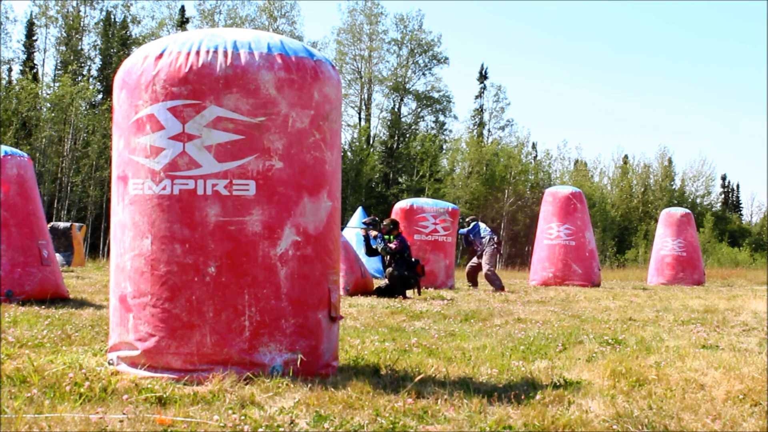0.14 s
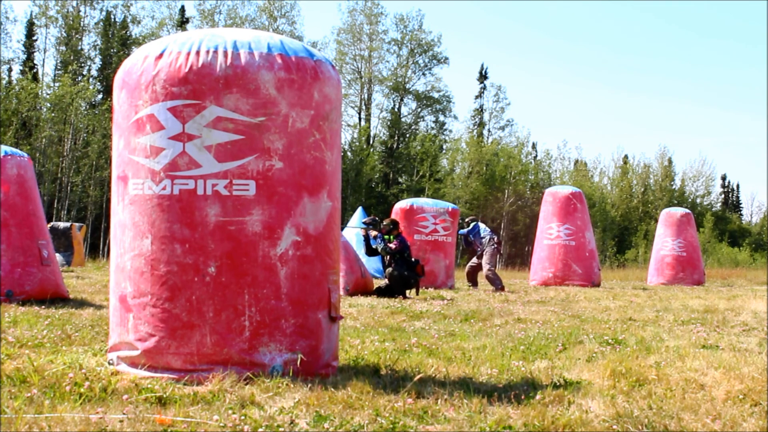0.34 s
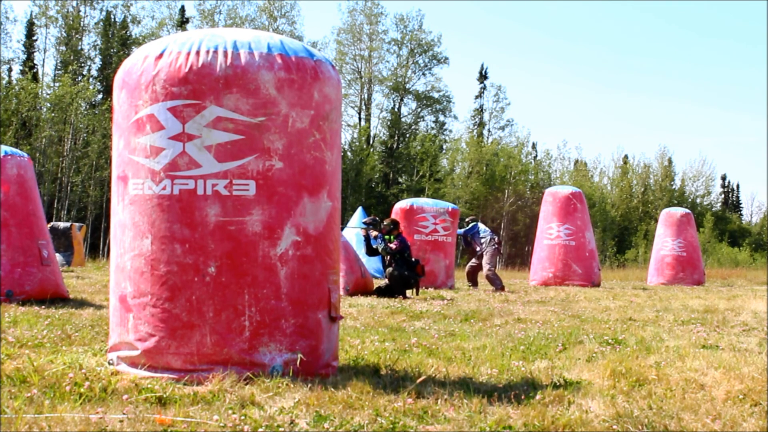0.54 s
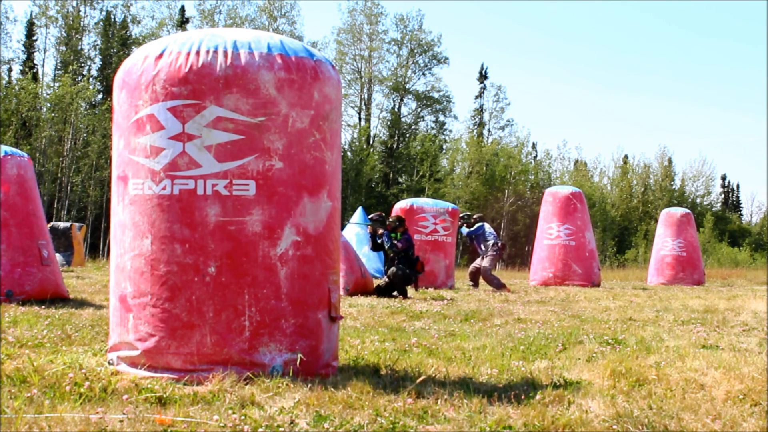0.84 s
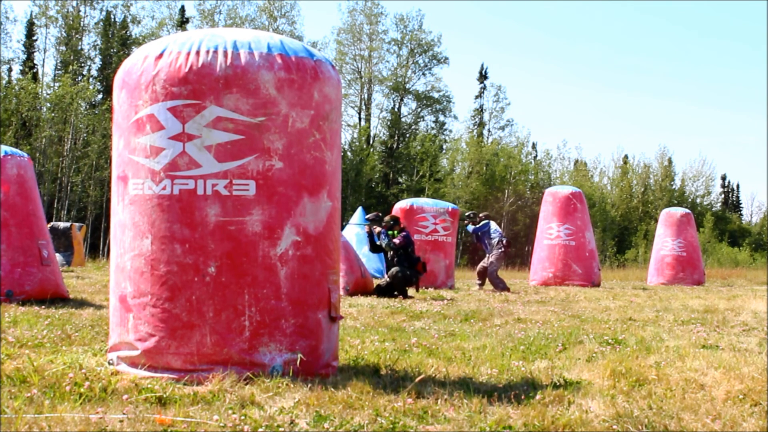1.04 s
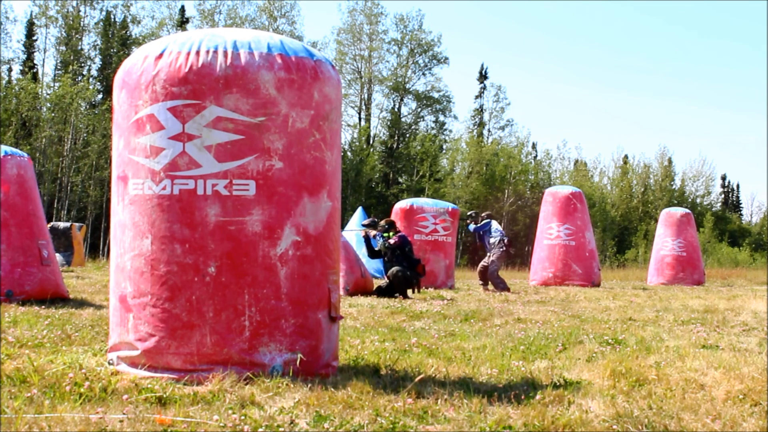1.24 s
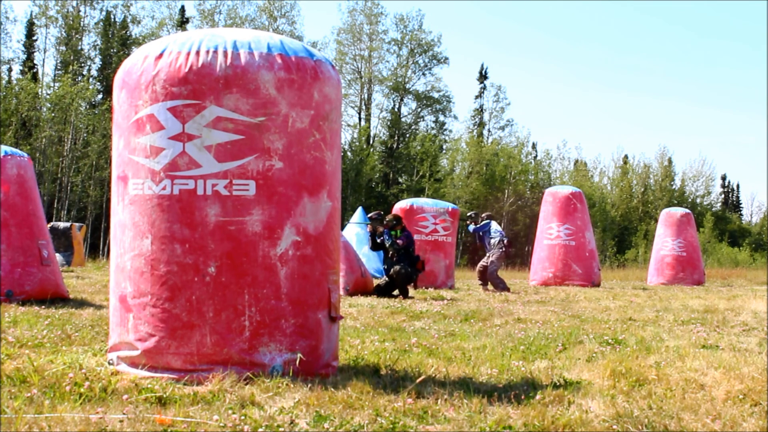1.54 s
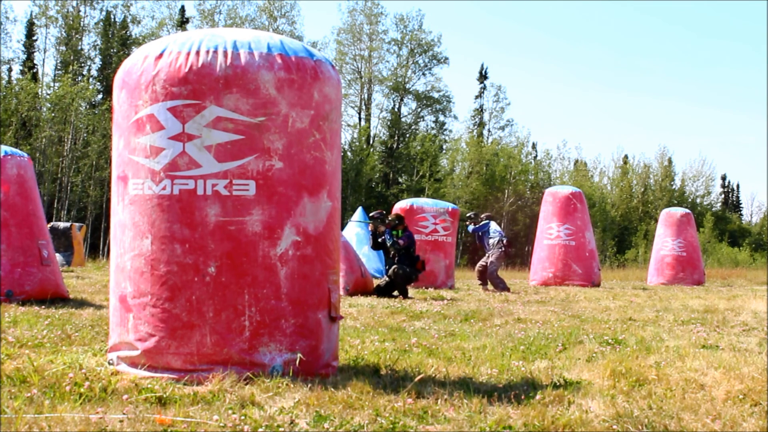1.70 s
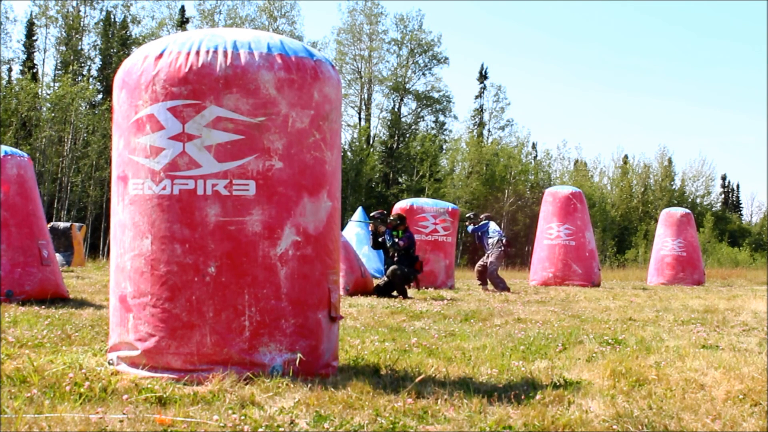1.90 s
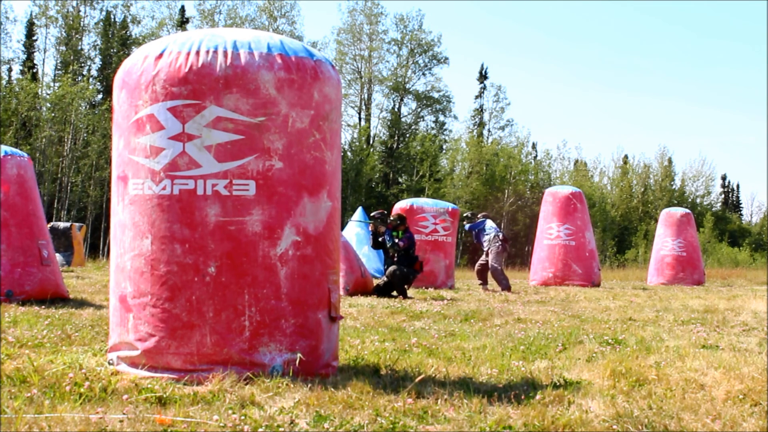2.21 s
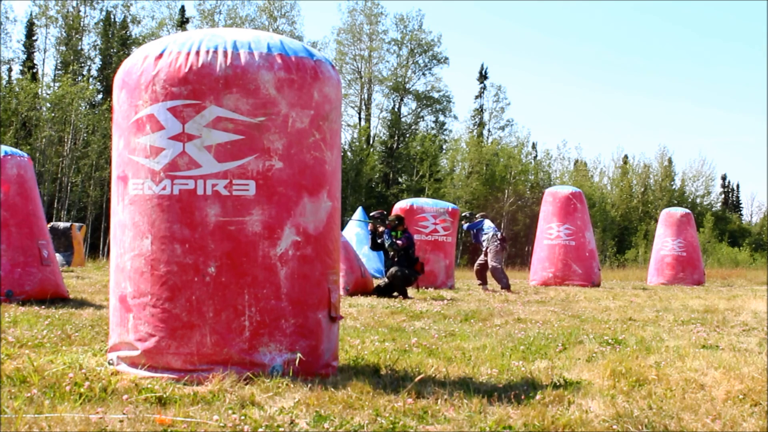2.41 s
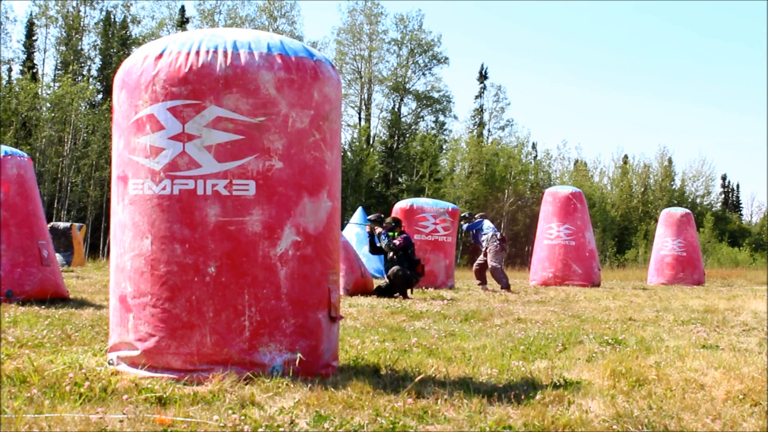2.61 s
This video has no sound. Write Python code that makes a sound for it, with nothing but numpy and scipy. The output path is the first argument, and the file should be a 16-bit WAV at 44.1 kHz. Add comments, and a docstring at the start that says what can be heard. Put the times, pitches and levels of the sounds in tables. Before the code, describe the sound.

Paintball guns fire on an open field: a distant one pops in a quick string, then a nearer one spits single shots and a rapid burst. Balls thump inflatable bunkers or crack apart, echoing off the trees.

```python
"""Paintball across an open field

Markers fire by sudden release of compressed gas: a far one pops in a short string, a nearer one
spits single shots and then a rapid burst. Balls thump into air-filled bunkers or burst with a crack.
Bunkers and the tree line reflect it all; the loudest hits overload the microphone and duck its gain."""
import sys
import numpy as np
from scipy import signal
from scipy.fft import rfft, irfft
from scipy.io import wavfile

SR = 44100
rng = np.random.default_rng(int(sys.argv[2]) if len(sys.argv) > 2 else 0)


def to_wav(sig):
    """Store sig (one row per channel, or 1-D mono) as 16-bit WAV at the path in sys.argv[1].

    Samples outside -1..1 are clipped; the rate is SR.
    """
    pcm = np.clip(np.atleast_2d(sig), -1, 1) * 32767
    pcm = np.round(pcm).astype(np.int16)
    wavfile.write(sys.argv[1], SR, pcm.T)  # frames by channels


N = 121275
TAPS = 8192  # samples in one short sound
T = np.arange(TAPS) / SR


def amp(db):
    """Amplitude ratio: tenfold for every 20 dB."""
    return 10 ** (np.asarray(db) / 20)


def read(points, hz, column=1):
    """Interpolation of one table column along a logarithmic frequency axis."""
    table = np.array(points, float)
    return np.interp(np.log(hz + 1), np.log(table[:, 0] + 1), table[:, column])


def add(mix, start_s, sound):
    """Superposition: a sound adds to the mix from its start time."""
    part = mix[round(start_s * SR):][:len(sound)]
    part += sound[:len(part)]


def through(sound, response):
    """Convolution: one short sound filtered by another."""
    return signal.fftconvolve(sound, response)[:TAPS]


def dying(t60_s):
    """Exponential damping: a fall of 60 dB in the given time."""
    return np.exp(-np.log(1000) * T / t60_s)


def pulse(spectrum, extra_db=lambda hz: 0):
    """Minimum phase: the sharpest causal pulse with a given spectrum."""
    hz = abs(np.fft.fftfreq(TAPS, 1 / SR))
    log_gain = np.log(amp(read(spectrum, hz) + extra_db(hz)))
    return np.fft.ifft(np.exp(np.conj(signal.hilbert(log_gain)))).real


def puff(envelope):
    """Whitened noise of unit energy; shaped twice, it dies somewhat faster than its envelope."""
    burst = rng.standard_normal(TAPS) * envelope
    whitened = irfft(np.exp(1j * np.angle(rfft(burst))))
    shaped = whitened * np.sqrt(envelope)
    return shaped / np.linalg.norm(shaped)


def crackle(envelope, grain_s=0.00046, depth_db=7.5):
    """Random amplitude modulation gathers a puff into small clumps, of unit total energy."""
    noise = puff(envelope)
    knots_s = np.arange(0, T[-1] + grain_s, grain_s)
    swings = np.minimum(rng.standard_normal(TAPS), 2)[:len(knots_s)]
    clumped = noise * amp(depth_db * np.interp(T, knots_s, swings))
    return clumped / np.linalg.norm(clumped)


def rattle(envelope, arrivals_per_s=700):
    """Sparse scattering: small reflections at random times, of unit total energy."""
    signs = np.sign(rng.standard_normal(TAPS))
    arrivals = envelope * signs * (rng.random(TAPS) < arrivals_per_s / SR)
    return arrivals / np.linalg.norm(arrivals)


def echoes(table, spread=0.):
    """Multipath: the direct impulse and delayed copies, each delay varied by a relative spread."""
    paths = np.zeros(TAPS)
    paths[0] = 1
    for (delay_ms, level_db), shift in zip(table, rng.standard_normal(len(table))):
        add(paths, abs(delay_ms * (1 + spread * shift)) / 1000, amp([level_db]))
    return paths


def air():
    """Ambient noise: the steady rumble and soft hiss of the outdoors."""
    # spectral density of the outdoor air: frequency_hz, level_db
    spectrum = [(15, 7), (45, 1), (100, -6.5), (250, -6.5), (800, -10.5), (2500, -15), (6000, -22.5),
                (15000, -26.5)]
    gain = amp(read(spectrum, np.fft.rfftfreq(N, 1 / SR)))
    noise = irfft(rfft(rng.standard_normal(N)) * gain, N)
    return amp(-57) * noise / noise.std()


def tail(bands, rise_s):
    """Diffuse reverberation: noise swells, then each band decays at its own rate."""
    hz, t, noise = signal.stft(rng.standard_normal(SR * 3 // 2), SR, nperseg=256)
    t60_s = read(bands, hz, column=2)[:, None]
    shape = np.exp(-np.log(1000) * t / t60_s) * (1 - np.exp(-(t / rise_s) ** 2))
    shape /= np.sqrt((shape ** 2).sum(1, keepdims=True) * t[1] * SR)  # unit energy in each band
    return signal.istft(noise * shape * amp(read(bands, hz))[:, None], SR, nperseg=256)[1]


def surroundings(sound, turn_s=0.08):
    """Scattering from field and trees; four sets of paths take turns, so the echoes vary."""
    # scatter from grass and bunkers: frequency_hz, level_db, t60_s
    field = [(80, -46, 0.52), (323, -18.5, 0.035), (1110, -17, 0.19), (2670, -20.5, 0.11),
             (5860, -13.5, 0.084), (14100, -15.5, 0.056)]
    # long return from the tree line: frequency_hz, level_db, t60_s
    trees = [(80, -17.5, 0.45), (297, -46, 0.71), (704, -25.5, 2.8), (1480, -17, 0.71), (2290, -18.5, 9.2),
             (5300, -19.5, 0.99), (8300, -20, 0.91), (14000, -70, 0.48)]
    out = np.zeros(N)
    turn = np.floor(np.arange(N) / SR / turn_s) % 4
    for k in range(4):
        response = tail(field, rise_s=0.011) + tail(trees, rise_s=0.0097)
        out += signal.fftconvolve(sound * (turn == k), response)[:N]
    return out


def far_marker():
    """Multipath propagation: a dry muzzle pop arrives with a quick train of reflections."""
    # far shots: start_s, level_db, echo_gain_db
    shots = [(0.489, -30.5, -2), (0.5026, -11.5, 10.5), (0.5862, -8.5, 7), (0.6699, -5.5, 4),
             (0.7528, -3.5, 1.5), (0.8366, -8.5, 2.5), (2.6866, -18.5, 7.5)]
    # spectrum of the muzzle pop: frequency_hz, level_db
    pop_spectrum = [(40, -1), (110, 13), (240, 9.5), (400, 4), (700, -2.5), (1000, 10.5), (1500, 3),
                    (2300, 9.5), (3100, 7.5), (4500, 0.5), (7000, -7.5), (15000, -18.5)]
    # reflections from ground and bunkers: delay_ms, level_db
    reflections = [(.45, -13), (3.45, -6), (4.85, -8.5), (7.6, -15), (13.6, -15), (18.2, -18.5)]
    out, pop = np.zeros(N), pulse(pop_spectrum)
    for start_s, level_db, echo_gain_db in shots:
        paths = echoes(reflections, spread=0.014) + amp(-2.5) * crackle(dying(0.058))
        paths[1:] *= amp(echo_gain_db)  # all but the direct sound
        add(out, start_s, amp(level_db) * through(pop, paths))
    return out


def ball_cracks():
    """Brittle fracture: a shell bursts with a snap and a brighter spatter of paint."""
    # balls bursting on a hard surface: start_s, level_db, spatter_db
    bursts = [(1.0499, 2.5, 0.5), (1.197, 7, -7), (1.3558, -18.5, -18), (1.967, -24, -2), (2.2526, 5, -11),
              (2.4016, 3.5, -14), (2.6386, -14.5, -20)]
    # spectrum of the snap: frequency_hz, level_db
    snap_spectrum = [(50, -14), (250, 12), (600, 2), (1000, 12.5), (1400, 14.5), (2100, 22.5), (2800, 15.5),
                     (3800, 16), (5500, 1), (9000, -4.5), (15000, -21.5)]
    # reflections of the snap: delay_ms, level_db
    reflections = [(2.8, -13), (23.5, -23.5)]
    tilt_db_per_octave = 9.5
    out, snap = np.zeros(N), pulse(snap_spectrum)
    spray = pulse(snap_spectrum, lambda hz: tilt_db_per_octave * np.log2((hz + 100) / 3000))
    for start_s, level_db, spatter_db in bursts:
        spatter = amp(spatter_db) * through(spray, crackle(dying(0.043)))
        add(out, start_s, amp(level_db) * (through(snap, echoes(reflections)) + spatter))
    return out


def bunker_thumps():
    """Membrane and cavity: a ball slaps and its blow returns off the ground; the wall knocks, the skin
    flutters, the air resonates."""
    # balls striking bunkers: start_s, level_db, softness_corner_hz, ground_echo_ms, ground_echo_db, # knock_db,
    # flutter_db, flutter_decay_s, boom_db
    hits = [(.7900, -22.5, 1790, 0.49, 5.5, 4, -31, .08, -14),
            (1.0481, -1, 2130, 0.45, 3, -0.5, -6, 0.18, -4),
            (1.2427, -7.5, 4200, 0.42, -17, -8.5, -10.5, 0.53, -8),
            (1.3336, -2, 2320, 0.28, -9.5, 1.5, -14.5, 0.43, -43),
            (1.488, -2, 1860, 0.4, -4.5, 0, -16.5, 0.39, -6),
            (1.5794, 2, 2500, .55, -1.5, -4, -21, 0.14, -11),
            (1.9440, -9.5, 1300, 0.22, -4.5, -12, -1, 0.49, 12),
            (1.948, -9.5, 2090, 1.58, 5, -4, -1.5, 0.45, 8.5),
            (1.9607, -11, 1810, 1.38, -2, -1, -6, 0.16, 15.5),
            (2.1217, -7, 1970, 0.84, 8, -1, 1.5, 0.41, -35),
            (2.1310, -20.5, 1800, 0.81, -4, 8, -15, 0.073, -18),
            (2.4657, -5.5, 2200, 0.47, -9.5, -15, -12, 0.58, -8),
            (2.5416, -3.5, 3500, 0.59, -7.5, -14, -22, 0.085, -3),
            (2.5553, -3, 2600, 0.11, -12.5, -29, -16.5, 0.025, 1),
            (2.6070, -8, 5740, 0.82, -42, -6, -12, 0.35, -11)]
    # spectrum of the blow: frequency_hz, level_db
    blow_spectrum = [(30, 2), (70, 24.5), (170, 28.5), (300, 22.5), (600, 22), (1200, 18.5), (2000, 15.5),
                     (3200, 16.5), (5000, -0.5), (8000, -3), (15000, 5)]
    # hollow knock of the wall: frequency_hz, level_db
    knock_spectrum = [(80, 10), (350, 18.5), (700, 26.5), (1150, 14.5), (2000, -8.5), (4000, 0.5),
                      (15000, -34.5)]
    # flutter of the vinyl skin: frequency_hz, level_db
    flutter_spectrum = [(60, -5), (250, 18.5), (500, 9), (900, 24.5), (1500, 26.5), (2500, 17.5),
                        (3800, 7.5), (5500, -19), (15000, -32)]
    # modes of the enclosed air: pitch_hz, level_db, t60_s
    air_modes = [(106, -8, 0.009), (198.6, -5.5, 0.14), (271.5, -0.5, 0.076), (757, -16, 0.24)]
    out, skin, wall = np.zeros(N), pulse(flutter_spectrum), pulse(knock_spectrum)
    boom = -sum(amp(db - 17.5) * dying(t60_s) * np.sin(2 * np.pi * hz * T) for hz, db, t60_s in air_modes)
    flutter_rise = 1 - dying(0.0062)
    for start_s, level_db, corner_hz, ground_echo_ms, ground_echo_db, knock_db, flutter_db, decay_s, boom_db in hits:
        soft_slap = pulse(blow_spectrum, lambda hz: -10 * np.log10(1 + (hz / corner_hz) ** 3.8))
        blow = -through(soft_slap, echoes([(ground_echo_ms, ground_echo_db)]))
        knock = amp(knock_db) * through(wall, puff(dying(0.01)))
        flutter = amp(flutter_db) * through(skin, crackle(dying(decay_s) * flutter_rise))
        add(out, start_s, amp(level_db) * (blow + knock + flutter + amp(boom_db) * boom))
    return out


def near_marker():
    """Sudden gas release: the valve cracks, the barrel rings, gas spits and pushes the air; echoes follow."""
    # near shots: start_s, crack_db, gas_db, ring_hz
    shots = [(0.7813, -1, -1.5, 3350), (0.9203, -10.5, -2, 4140), (1.0397, 0, 2.5, 2260),
             (1.5724, -6.5, -1.5, 3570), (1.7127, -1.5, -2, 2290), (1.8496, 1, 3, 4035),
             (1.9860, -2, 2, 3950), (2.0660, 2, 2, 2100), (2.1459, -5, -4, 2780), (2.2261, -7.5, -3, 2250),
             (2.3068, -4, -1.5, 2250), (2.3870, -2.5, -2, 2150), (2.4677, -9, -5, 2200),
             (2.5474, -25, -6.5, 2580)]
    # crack of the valve: frequency_hz, level_db
    crack_spectrum = [(60, -1), (350, 17.5), (500, 6), (700, -8.5), (1000, -11), (1500, 2.5), (2200, 18.5),
                      (2900, 11), (3900, 8.5), (6000, -20.5), (15000, -17)]
    # hiss of the escaping gas: frequency_hz, level_db
    gas_spectrum = [(50, -27), (150, 9), (400, 10.5), (700, 2.5), (1200, 8.5), (2200, 10), (2900, 8.5),
                    (4000, 10), (5000, 6), (8000, 2), (10000, -1.5), (15000, -1)]
    # early reflections: delay_ms, level_db
    reflections = [(4.5, -6.5), (40.5, -22)]
    # rattling slapback from a group of bunkers: frequency_hz, level_db
    slapback_spectrum = [(200, -49), (1100, -14), (2200, -6.5), (5800, -6), (8000, -31), (15000, -34)]
    # distinct returns within the slapback: delay_ms, level_db
    slapback_returns = [(2.9, 1.5), (5.2, -9), (11, -7)]
    gas_lead_s, gas_hold_s, gas_fall_s = 0.000923, 0.0033, 0.002
    push_hz, push_delay_s, slapback_delay_s = 157.7, 0.0015, 0.0163
    common_share = 0.59  # part of the jet's energy with the same waveform in every shot
    out, crack, hiss = np.zeros(N), pulse(crack_spectrum), pulse(gas_spectrum)
    opening = np.minimum(T / gas_lead_s, 1) ** 2
    flow = opening * np.exp(-np.maximum(T - gas_hold_s, 0) / gas_fall_s)
    common_jet = np.sqrt(common_share) * puff(flow)
    push = -amp(-23.5) * np.sin(2 * np.pi * push_hz * T) * (T * push_hz < 1)  # a single cycle
    reflected_hiss = amp(-5) * through(hiss, pulse(slapback_spectrum))
    for start_s, crack_db, gas_db, ring_hz in shots:
        paths = echoes(reflections, spread=0.014)
        gas = through(hiss, common_jet + np.sqrt(1 - common_share) * puff(flow))
        ring = amp(-20) * dying(0.037) * np.sin(2 * np.pi * ring_hz * T)
        slapback = through(reflected_hiss, echoes(slapback_returns, spread=0.048) + rattle(dying(0.066)))
        trail = amp(-14.5) * through(hiss, rattle(dying(0.49)))
        add(out, start_s, amp(crack_db) * through(crack, paths) + amp(gas_db) * ring)
        add(out, start_s - gas_lead_s, amp(gas_db) * through(gas, paths))
        add(out, start_s + push_delay_s, amp(gas_db) * push)
        add(out, start_s + slapback_delay_s, amp(gas_db) * (slapback + trail))
    return out


def gain_control(sound, input_gain_db=6, threshold_db=-19.5, duck_share=0.74, recovery_db_per_s=5.5):
    """Compression: loud hits turn the gain down at once, and it creeps back up."""
    memory = np.exp(-1 / (0.005 * SR))  # power is averaged over 5 ms
    power = signal.lfilter([1 - memory], [1, -memory], sound[0] ** 2)
    excess_db = np.maximum(10 * np.log10(power + 1e-12) - threshold_db, 0)
    recovery_db = recovery_db_per_s * np.arange(N) / SR
    duck_db = np.maximum.accumulate(duck_share * excess_db + recovery_db) - recovery_db
    return sound * amp(input_gain_db - duck_db)


def scene():
    """Superposition of shots, hits, their reverberation and the outdoor air."""
    sources = np.array([far_marker(), near_marker(), bunker_thumps(), ball_cracks()])
    send_db = [6.5, 1.7, 5, -6]  # how strongly each source excites the surroundings
    return (sources.sum(0) + surroundings(amp(send_db) @ sources) + air())[None]


def record(dry):
    """Limited range: the microphone drops deep bass, ducks, clips its peaks and loses the top treble."""
    low_cut = signal.butter(2, 50, "high", fs=SR, output="sos")
    high_cut = signal.firwin(255, 15950, window=("kaiser", 9), fs=SR)
    clipped = np.clip(gain_control(signal.sosfilt(low_cut, dry)), -1, 1)
    return signal.oaconvolve(clipped, high_cut[None], "same")


dry = scene()
out = record(dry)
to_wav(out)
```